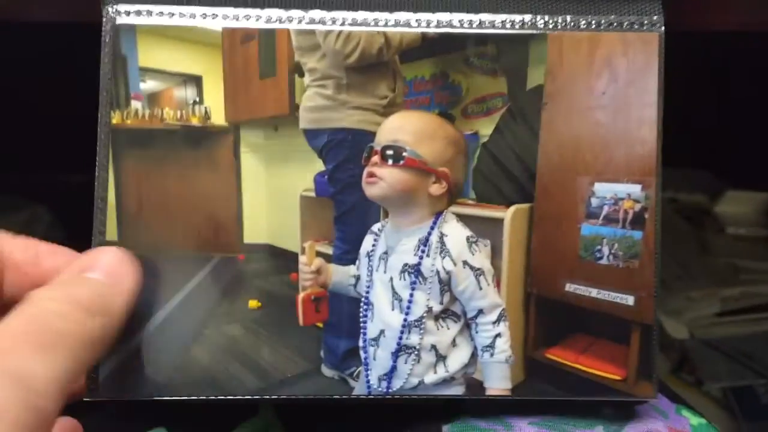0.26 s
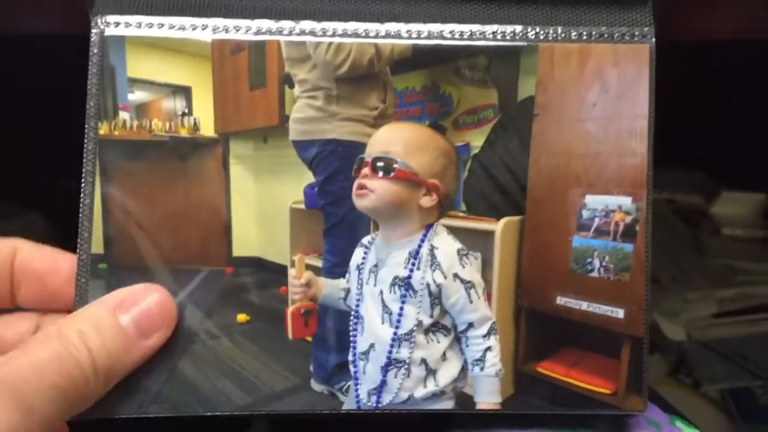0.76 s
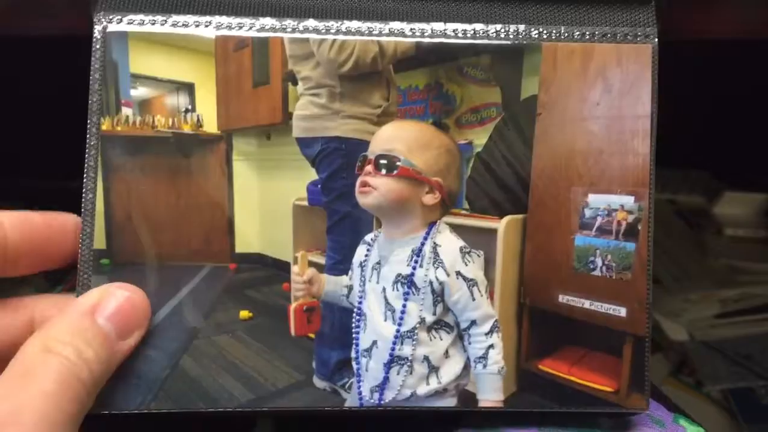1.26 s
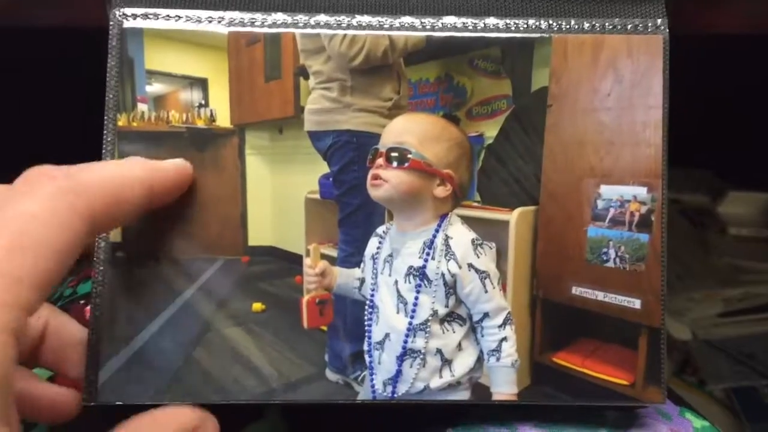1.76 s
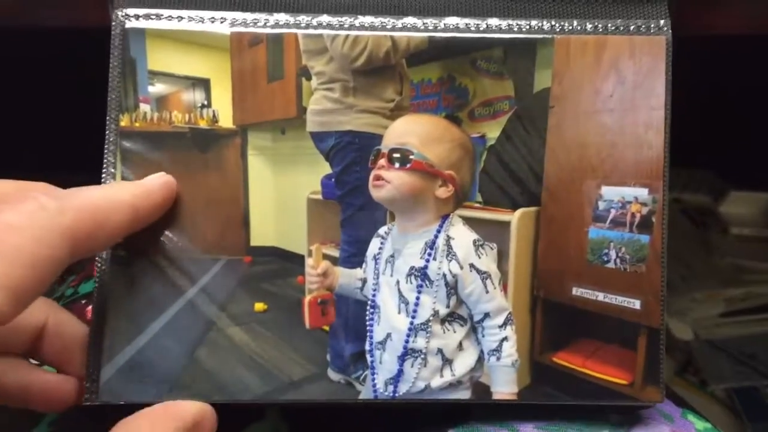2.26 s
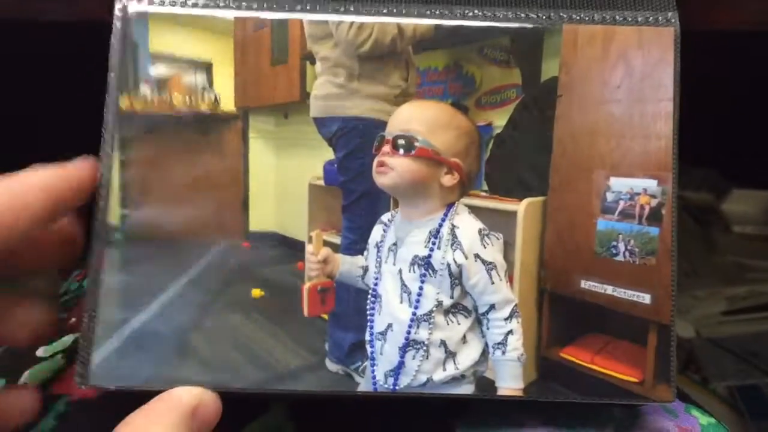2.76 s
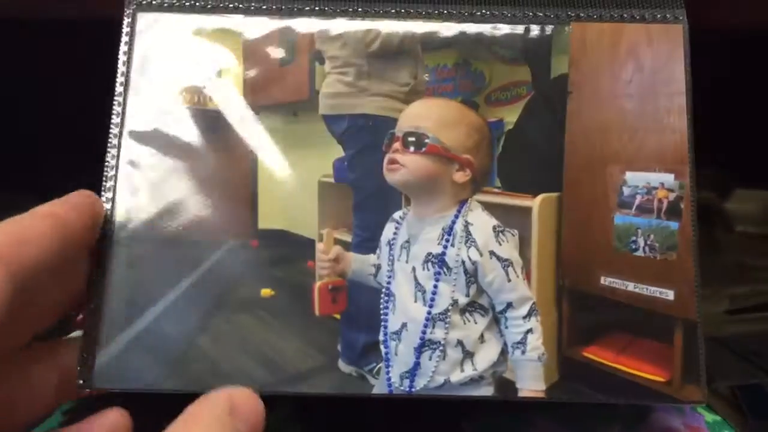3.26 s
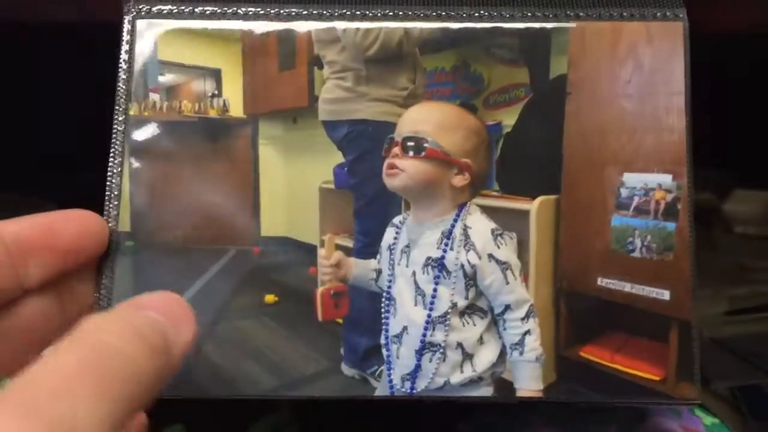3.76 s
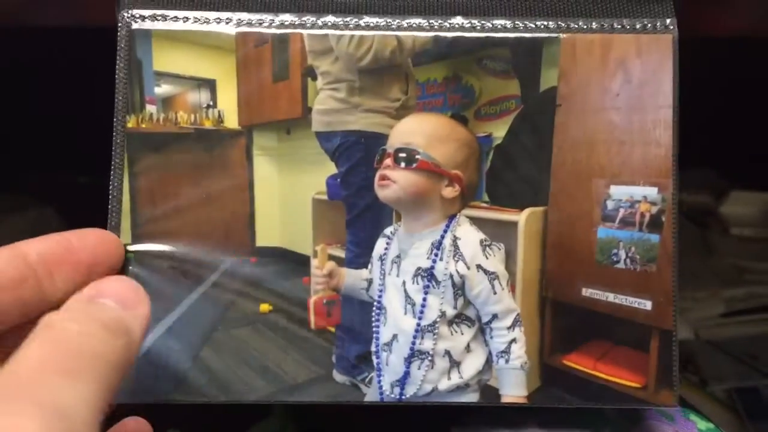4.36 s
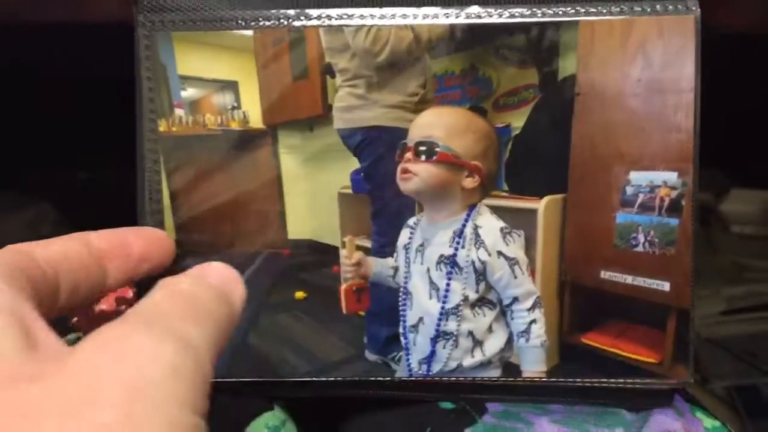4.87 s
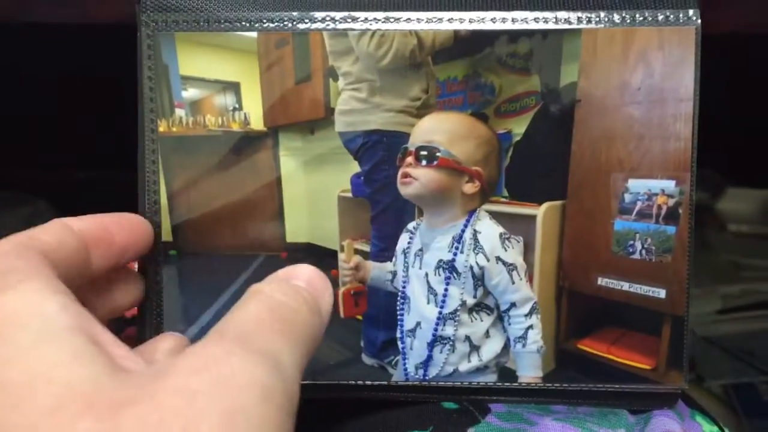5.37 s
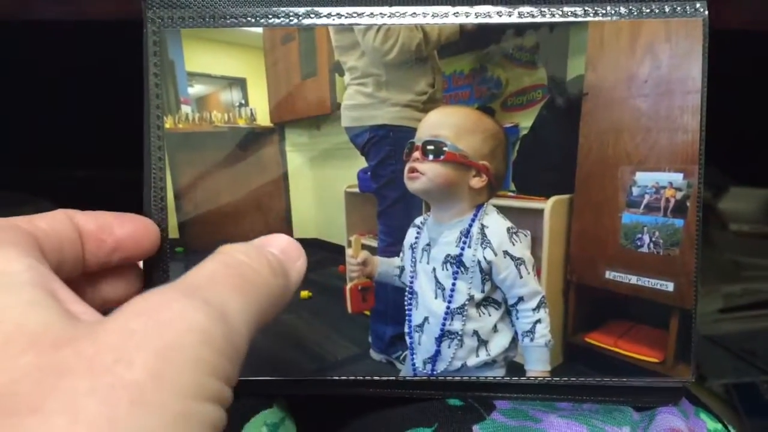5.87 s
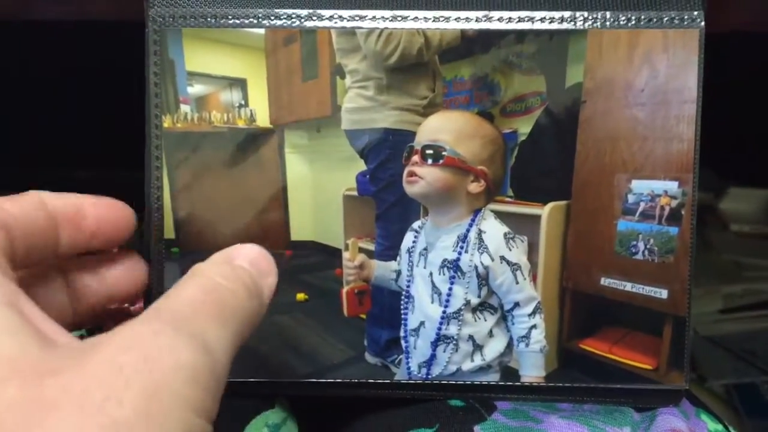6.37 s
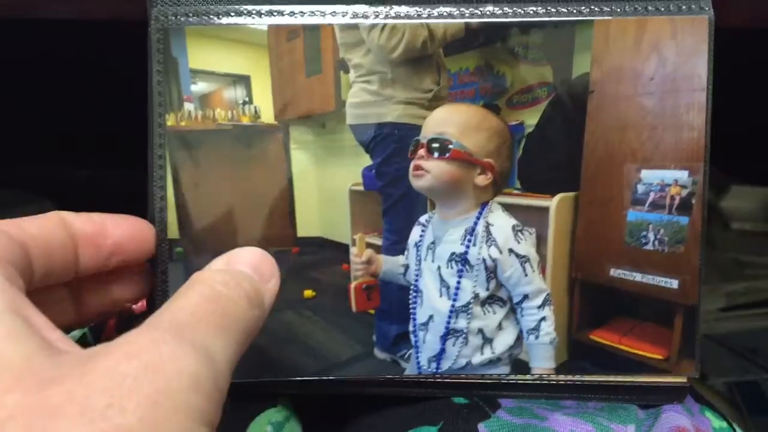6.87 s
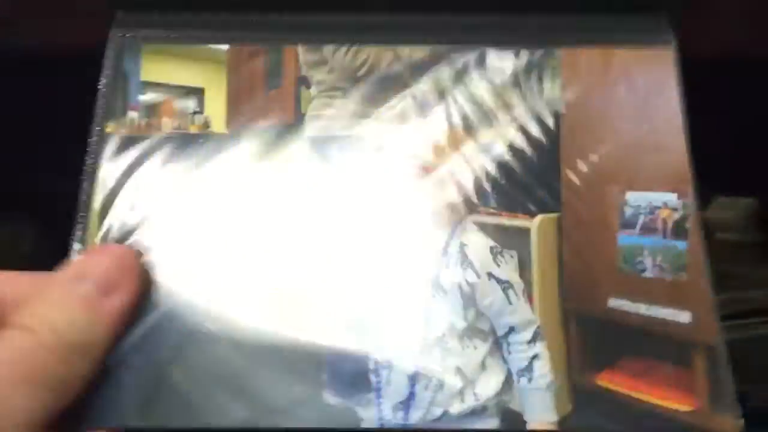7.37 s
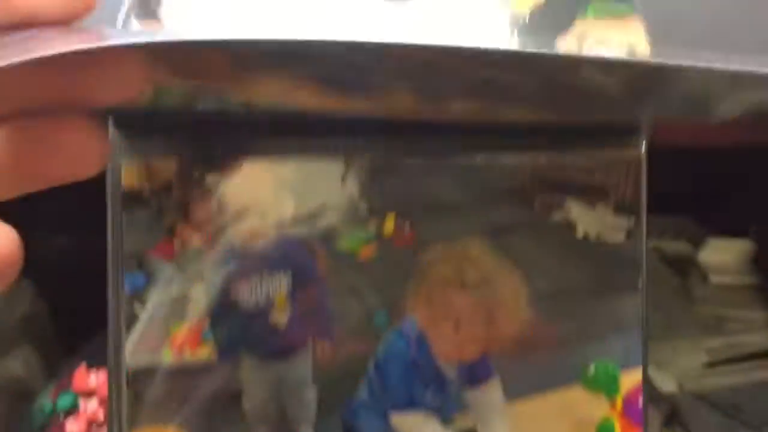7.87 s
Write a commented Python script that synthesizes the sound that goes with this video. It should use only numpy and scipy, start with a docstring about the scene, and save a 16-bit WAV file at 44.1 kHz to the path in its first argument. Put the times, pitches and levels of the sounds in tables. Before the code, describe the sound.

Clear plastic film crackles, ticks and swishes under fingers in a quiet room, with soft bumps and a sharp snap over a faint low hum.

```python
"""A hand holds, flexes and turns a clear plastic sleeve of a photo album, close to the microphone in a small room.
A faint rush of air (filtered noise) and a low machine hum (a wavering sine) run throughout.
Fingers swish over the film in dense runs of tiny slips, and the film ticks as it unsticks: sharp, ringing impulses.
Among these the album takes soft bumps, short puffs of dull noise; late on, the sleeve buckles in three ringing snaps."""
import sys
import numpy as np
from scipy import signal
from scipy.fft import rfft, irfft, next_fast_len
from scipy.io import wavfile
from scipy.ndimage import map_coordinates

SR = 44100
rng = np.random.default_rng(int(sys.argv[2]) if len(sys.argv) > 2 else 0)


def transcribe(signal):
    """Save signal, clipped to [-1, 1], as a 16-bit WAV file at the path in sys.argv[1]."""
    frames = np.atleast_2d(signal).T
    limited = np.clip(frames, -1, 1)
    pcm = np.round(limited * 32767).astype(np.int16)
    wavfile.write(sys.argv[1], SR, pcm)


N = 358533
FILTER_HZ = abs(np.fft.fftfreq(2048, 1 / SR))  # frequency grid of every colouring filter


def amp(db):
    """Turns decibels into an amplitude factor."""
    return 10 ** (np.asarray(db) / 20)


def unit(x):
    """Scales to an rms of one."""
    return x / np.sqrt(np.mean(x ** 2) + 1e-20)


def read(points, hz):
    """Joins points by straight lines over log frequency."""
    f, value = np.transpose(points)
    return np.interp(np.log(hz + 1), np.log(f), value)


def add(mix, start_s, sound):
    """Mixes a sound in at a time, cut at the end of the mix."""
    part = mix[max(round(start_s * SR), 0):][:len(sound)]
    part += sound[:len(part)]


def colour(x, response_db, slope=0):
    """Minimum-phase filter with the given response, tilted by slope dB per octave around 1 kHz."""
    tilt_db = slope * np.log2(np.maximum(FILTER_HZ, 150) / 1000)  # the tilt stops below 150 Hz
    log_gain = np.log(amp(response_db + tilt_db))
    taps = np.fft.ifft(np.exp(np.conj(signal.hilbert(log_gain)))).real
    return signal.fftconvolve(x, taps[:len(taps) // 2])


def wander(rate, size):
    """Random curve of about unit spread: straight lines between rate random points a second."""
    knots = rng.standard_normal(2000)
    curve = map_coordinates(knots, [np.arange(size) * rate / SR], order=1, mode="mirror")
    return curve / np.sqrt(2 / 3)  # makes up for the spread lost between the points


def peaks(modes):
    """Power response of a set of resonances."""
    return sum(amp(db) ** 2 / (1 + ((FILTER_HZ - hz) / width) ** 2) ** 2 for hz, width, db in modes)


def film(ring_hz, ring_db, ring_octaves, ripple_db):
    """Response in dB of one spot of film: a main resonance set by the size of the fold, and smaller chance ones."""
    # overall spectrum of the film: freq_hz [Hz], level_db [dB]
    film_spectrum = [(200, -28), (600, -29), (1000, -11), (1350, 0.5), (1700, -2.5), (2300, -1),
                     (3300, -1.5), (5000, -4), (7500, -5.5), (9500, -6), (10700, -7.5), (12500, -6.5),
                     (15000, -8), (16500, -14.5)]
    ripple_hz = np.geomspace(600, 17000, 60)
    ripple = ripple_db * np.interp(FILTER_HZ, ripple_hz, rng.standard_normal(len(ripple_hz)))
    octaves_off = np.log2((FILTER_HZ + 1) / ring_hz)
    ring = ring_db / (1 + (octaves_off / ring_octaves) ** 2)
    return read(film_spectrum, FILTER_HZ) + ring + ripple


def air(air_db=-66.5, waver_db=4, waver_rate=20, drift=0.02, drift_rate=12):
    """Steady rush of air with hollow resonances that each waver in strength and pitch."""
    # spectrum of the rush, relative: freq_hz [Hz], level_db [dB]
    air_spectrum = [(25, -17), (45, -3), (75, -4.5), (100, -19), (135, -13.5), (170, -21.5), (250, -12),
                    (330, -26), (460, -27), (1100, -27), (2050, -31), (2600, -35.5), (5000, -41),
                    (15500, -48.5)]
    # hollow resonances in the rush: centre_hz [Hz], width_hz [Hz], level_db [dB rms]
    air_resonances = [(231.2, 15, -68), (297.3, 26.6, -71.5), (340.6, 17.4, -75.5), (390, 15, -77),
                      (921.5, 27, -77), (970, 12, -92.5), (1045, 11.7, -77), (1235, 10, -84),
                      (1291, 26, -76.5), (1383, 12, -81.5), (1828, 57, -78.5), (1986, 34, -82),
                      (2062, 17, -85), (2350, 10, -88.5)]
    hz = np.fft.rfftfreq(N, 1 / SR)
    wash = rfft(rng.standard_normal(N)) * amp(read(air_spectrum, hz))
    # air_db is the rms level of the part above 150 Hz
    out = amp(air_db) * irfft(wash, N) / np.std(irfft(wash * (hz > 150), N))
    size = next_fast_len(N, True)
    hz = np.fft.rfftfreq(size, 1 / SR)
    for centre_hz, width_hz, level_db in air_resonances:
        band = 1 / (1 + ((hz - centre_hz) / width_hz) ** 2)
        ring = irfft(rfft(rng.standard_normal(size)) * band, size)
        # playing the ring at a wavering speed bends its pitch; drift is a fraction of the speed
        position = np.cumsum(1 + drift * wander(drift_rate, N)) % size
        ring = np.interp(position, np.arange(size), ring)
        out += amp(level_db) * unit(ring * amp(waver_db * wander(waver_rate, N)))
    return out


def hum(hum_hz=57.74, drift_hz=0.15, drift_rate=5, waver_db=-67, waver_rate=14, mains_hz=120, mains_db=-75):
    """A motor's low hum, whose wavering shows more as it fades, and a faint mains tone."""
    # level of the hum, fading unevenly: time_s [s], level_db [dB rms]
    hum_level = [(0.0, -45), (4.25, -46.5), (4.5, -48), (6.5, -47.5), (6.8, -50.5), (7.5, -48), (7.75, -52),
                 (8.13, -49.5)]
    t = np.arange(N) / SR
    phase = 2 * np.pi * np.cumsum(hum_hz + drift_hz * wander(drift_rate, N)) / SR
    level = amp(np.interp(t, *np.transpose(hum_level))) + amp(waver_db) * wander(waver_rate, N)
    mains = amp(mains_db) * np.sin(2 * np.pi * mains_hz * t)
    return np.sqrt(2) * (level * np.sin(phase) + mains)


def swishes(slips_per_s=350, spread_db=3.5, edge_db=18, roundness=1.15, grip_db=0.5, grip_rate=170,
            shift_db=7, shift_rate=80, reach=0.64, trim_db=-1, count=5):
    """Sliding is a dense run of tiny slips that swells and dies away across spots of film, each with its own ring."""
    # slides of skin or film over film: crest_s [s], rise_s [s], fall_s [s], level_db [dB at the crest, before
    # trim_db], slope [dB per octave], first_hz [Hz, ring of first spot], last_hz [Hz, of last], grain [0-1]
    swish_events = [(0.311, 0.01, 0.011, -60, -6.5, 2400, 3500, 0.7),
                    (0.43, 0.16, 0.14, -73, -2, 3800, 7000, 0.8),
                    (0.528, 0.017, 0.017, -62.5, -4, 2000, 4000, .8),
                    (0.735, 0.05, 0.087, -66, 2, 3400, 4500, .5),
                    (0.811, 0.019, 0.0057, -47, -0.5, 2400, 3600, 0.9),
                    (1.56, 0.064, 0.077, -69, -1, 6000, 6000, .3),
                    (1.597, 0.038, 0.02, -62.5, -2.5, 3600, 4800, .4),
                    (1.684, 0.036, 0.0064, -46.5, 1.5, 3200, 5200, 0.4),
                    (1.802, 0.05, .016, -53, 0, 3400, 3600, .7),
                    (1.806, 0.051, 0.027, -51, 0, 9500, 9500, .5),
                    (2.161, 0.0046, 0.0057, -51, 3, 3400, 12000, 0.66),
                    (2.188, 0.025, 0.045, -58, 0.5, 6500, 4500, .4),
                    (2.245, 0.041, 0.072, -55.5, 1, 6500, 3400, 0.46),
                    (2.283, 0.041, 0.044, -57.5, 1.5, 8200, 8800, 0.45),
                    (2.687, 0.012, 0.012, -60, -2.5, 5600, 5600, .6),
                    (3.013, 0.021, 0.019, -53.5, 6, 10400, 10400, 0.63),
                    (3.342, 0.02, 0.094, -49.5, 0.5, 4470, 3400, 0.5),
                    (3.542, 0.024, 0.012, -44, 2, 9000, 3500, 0.45),
                    (4.915, 0.029, 0.008, -55.5, 0, 9600, 9600, 0.3),
                    (5.016, 0.028, 0.008, -53, 1, 6600, 2500, .7),
                    (5.134, 0.042, 0.042, -63.5, 5, 3000, 3000, 0.6),
                    (5.355, 0.029, 0.025, -59, -1, 12200, 12200, 0.25),
                    (5.568, 0.0047, 0.03, -60.5, 8, 3000, 3000, 0.5),
                    (6.588, 0.013, 0.015, -49.5, 4, 3700, 3900, 0.33),
                    (7.387, 0.059, 0.059, -60.5, 1.5, 1900, 12000, 0.56),
                    (7.468, 0.061, 0.11, -64.5, 2, 14000, 6600, 0.35),
                    (7.603, 0.052, 0.07, -67.5, 2, 7000, 6500, 0.4),
                    (7.738, 0.064, 0.061, -61.5, 3, 3600, 7500, 0.4),
                    (7.723, 0.023, 0.031, -57, -12.5, 1200, 1500, 0.7),
                    (7.791, 0.023, 0.026, -57, -11, 1300, 1400, 0.64),
                    (7.916, 0.027, 0.035, -62.5, -12.5, 1300, 1300, 0.7),
                    (7.786, 0.094, 0.089, -64, 3, 7000, 3200, .25),
                    (7.812, 0.016, 0.014, -49.5, 8, 6600, 3100, 0.5),
                    (7.888, 0.051, 0.035, -66.5, 7, 13500, 13000, .2),
                    (8.109, 0.085, 0.09, -63, 3.5, 13000, 9500, 0.57)]
    out, t = np.zeros(N), np.arange(SR // 3) / SR
    for crest_s, rise_s, fall_s, level_db, slope, first_hz, last_hz, grain in swish_events:
        away = np.minimum(np.maximum(1 - t / rise_s, (t - rise_s) / fall_s), 1)  # 0 at the crest, 1 at both ends
        end_fade = np.minimum(10 * (1 - away), 1)
        stroke = amp(-edge_db * away ** roundness) * end_fade
        # the grip catches and lets go, so the rub comes in clumps
        grip = amp(grain * grip_db * wander(grip_rate, len(t)))
        # pressure passes from the first spot to the last, shifting at random on the way
        travel = np.minimum(t / (rise_s + fall_s), 1)
        pressure = []
        for spot in np.linspace(0, 1, count):
            shift = amp(shift_db * wander(shift_rate, len(t)))
            pressure.append(shift * np.exp(-((travel - spot) / reach) ** 2))
        shares = np.array(pressure) / np.linalg.norm(pressure, axis=0)
        rub = 0
        for share, ring_hz in zip(shares, np.geomspace(first_hz, last_hz, count)):
            sizes = amp(spread_db * np.minimum(rng.exponential(1, len(t)), 4))
            signs = rng.choice([-1, 1], len(t))
            slips = sizes * signs * (rng.random(len(t)) < slips_per_s / SR)
            # grain blends from smooth hiss to separate slips
            friction = grain * unit(slips) + (1 - grain) * rng.standard_normal(len(t))
            response_db = film(ring_hz, ring_db=7.5, ring_octaves=0.21, ripple_db=5)
            rub = rub + share * unit(colour(friction * grip, response_db, slope)[:len(t)])
        add(out, crest_s - rise_s, amp(level_db + trim_db) * stroke * rub)
    return out


def ticks(rise_s=0.00065, decay_s=0.0023):
    """Where film unsticks or creases: a sharp release and a scatter of waves in the film."""
    # single ticks: release_s [s], energy_db [dB], slope [dB per octave], ring_hz [Hz, ring of the fold], rasp [0-1]
    tick_events = [(0.4392, -45, 1, 13500, .1), (0.445, -36, 1, 6050, .4), (0.4603, -41.5, 0, 7300, 0.3),
                   (0.489, -41.5, 1, 7300, .05), (0.7245, -39, 4, 4500, .4), (0.736, -30, 1, 12000, .3),
                   (0.7635, -31.5, 2.5, 3900, 0.07), (0.771, -37, 0, 14000, .2),
                   (0.813, -23.5, -0.5, 13500, .6), (0.8133, -26, -1.5, 3430, 0),
                   (0.8159, -20.5, -1, 3520, .15), (1.2548, -38, -5, 2100, 0),
                   (1.272, -36.5, -3, 2400, 0.06), (1.292, -37.5, -2, 2300, .2), (1.658, -36, -1, 3600, .2),
                   (1.6653, -27, -3, 3300, 0), (1.672, -24, -1, 3000, .3), (1.6745, -20, -5, 3900, .2),
                   (1.6766, -19.5, -2, 2440, 0.36), (1.6779, -17, 3, 5200, 0.1),
                   (1.6847, -22, 2, 14000, .6), (1.6876, -19.5, 3.5, 3270, 0.3), (1.819, -23, 1, 3600, 0.7),
                   (1.822, -29, 1.5, 3500, 0.2), (2.1618, -32, -1.5, 9500, .2), (2.165, -35, -1, 6960, .2),
                   (2.199, -46, -4, 1900, .3), (2.24, -36, -1, 7200, .1), (2.2535, -35, 1, 3500, .1),
                   (2.2674, -37, -2, 4200, .1), (2.283, -43, 0, 8500, .2), (2.8833, -37.5, -2.5, 2400, 0.5),
                   (3.3305, -39, -2, 4000, 0.1), (3.34, -25, 1, 13500, 0.3), (3.3605, -33, 0, 3900, 0.3),
                   (3.3708, -40, 0, 8300, 0.2), (3.377, -36, -3, 3700, .1), (3.3825, -37, -6, 3900, .1),
                   (3.3928, -32, 0, 3300, 0.04), (3.4178, -36, 0.5, 6500, .25),
                   (3.4402, -32.5, -1, 4200, .5), (3.4505, -35, 0, 4000, .3), (3.492, -33.5, 1, 14000, 0.2),
                   (3.5033, -34, 0, 3800, .4), (3.5115, -34, 3, 4000, 0.63),
                   (3.5171, -23.5, -2.5, 3900, 0.03), (3.5239, -24, -5, 4300, 0.1),
                   (3.53, -19, -4.5, 3700, 0.15), (3.542, -27, 5, 3700, 0.2), (3.545, -28, -6, 3500, .2),
                   (4, -37, 4, 5600, .5), (4.0068, -34.5, 2, 5400, 0.2), (4.0663, -23, -2, 3900, 0),
                   (4.0681, -19, -2.5, 4700, 0.11), (5.0204, -22.5, -1, 6430, 0.2),
                   (5.1298, -33, 7, 3100, 0), (5.138, -36, 2, 7000, 0), (5.357, -31.5, 0, 3670, 0),
                   (5.5609, -33.5, -1, 14500, .05), (5.566, -31, 1, 14500, 0.26),
                   (6.391, -32, 12, 7000, .15), (6.577, -30.5, 5, 3900, 0.3), (6.728, -43, 2, 8000, .6),
                   (6.8822, -39, 0, 7500, 0), (7.0845, -40.5, -1.5, 7900, 0), (7.21, -20.5, 1, 6500, 0.02),
                   (7.3855, -43, -2, 3000, 0.3), (7.4231, -29.5, 1.5, 1730, 0.01),
                   (7.8093, -34, 4, 6600, 0.3), (7.8121, -29, 2.5, 3080, .3), (7.815, -35, 0, 3500, .3),
                   (8.118, -38, 3, 1600, 0)]
    out, t = np.zeros(N), np.arange(-100, 300) / SR  # the release is at t = 0
    for release_s, energy_db, slope, ring_hz, rasp in tick_events:
        scatter = rng.standard_normal(len(t)) * np.exp(np.minimum(t / rise_s, -t / decay_s))
        release = rasp * scatter + (t == 0)
        sound = colour(release, film(ring_hz, ring_db=10.5, ring_octaves=0.32, ripple_db=3), slope)
        add(out, release_s + t[0], amp(energy_db) * sound / np.linalg.norm(sound))
    return out


def bumps(page_db=7, page_width_hz=150):
    """Soft contacts give a short dull puff from the stack of pages, with a hollow note from the page touched."""
    # soft knocks of fingers and page: crest_s [s], level_db [dB at the crest], length_s [s, time constant],
    # slope [dB per octave], page_hz [Hz, note of the page]
    bump_events = [(1.245, -51, 0.0046, -4.5, 1050), (1.272, -59, 0.0052, 4, 1350),
                   (1.293, -52, 0.0066, -4, 1080), (2.166, -55, 0.0052, 4, 1300),
                   (3.347, -48.5, 0.0057, 9.5, 1290), (4.07, -51, 0.0016, 1, 1400),
                   (5.023, -46, 0.0032, 2.5, 980), (5.058, -58, 0.023, -5.5, 950),
                   (5.332, -54.5, 0.0089, -3.5, 1050), (5.352, -56, 0.0033, 0, 720),
                   (5.554, -55, 0.0046, -1.5, 900), (5.564, -54, 0.0063, -1, 720),
                   (6.419, -50, 0.0053, -3, 1000), (6.599, -51.5, 0.0066, -0.5, 1080),
                   (7.389, -51, 0.0063, 3.5, 1340), (7.402, -52, 0.0063, 0, 380),
                   (7.426, -49.5, 0.0067, -2, 200), (7.4235, -48, 0.002, 10.5, 1620),
                   (7.585, -50.5, 0.00245, 1, 1260), (7.588, -47, 0.005, -1.5, 480),
                   (8.121, -47.5, 0.0038, 11, 1600)]
    # dull spectrum of the album: freq_hz [Hz], level_db [dB]
    album_spectrum = [(40, -23), (90, 9), (220, -2.5), (400, -5.5), (620, -7), (1000, -6), (1400, -4.5),
                      (2200, -27), (4000, -54), (16000, -50)]
    out, t = np.zeros(N), np.arange(SR // 3) / SR
    for crest_s, level_db, length_s, slope, page_hz in bump_events:
        age = t / length_s - 2  # 0 at the crest
        contact = np.exp(-np.where(age < 0, age ** 2, age))
        page_note = page_db / (1 + ((FILTER_HZ - page_hz) / page_width_hz) ** 2)
        body = read(album_spectrum, FILTER_HZ) + page_note
        puff = unit(colour(rng.standard_normal(len(t)), body, slope)[:len(t)])
        add(out, crest_s - 2 * length_s, amp(level_db) * contact * puff)
    return out


def snaps(scatter=0.11, rise_s=0.00028, fold_s=0.00096, fold_width_hz=1100, first_db=-5, second_db=-5):
    """The sheet flips through in an instant, rings briefly with two notes set by the fold, and knocks on the photo."""
    # buckles of the sleeve: snap_s [s], energy_db [dB], slope [dB per octave], knock_db [dB, knock on the photo],
    # first_hz [Hz, first ring of the fold], second_hz [Hz, second ring]
    snap_events = [(6.27, -14.5, -1, -9.5, 4730, 11800), (6.363, -12, -3, -9.5, 7700, 12000),
                   (6.416, 1, 0.5, 6, 9400, 14750)]
    # rings of the buckling sleeve: freq_hz [Hz], width_hz [Hz], level_db [dB]
    sleeve_modes = [(2100, 190, 1), (2480, 290, 3), (3450, 420, 1), (4200, 780, -5), (5660, 830, -10),
                    (8400, 560, -10), (9500, 500, -12), (11400, 380, -21), (13500, 530, -8),
                    (15400, 700, -9)]
    # rings of the stiff photo inside: freq_hz [Hz], width_hz [Hz], level_db [dB, before knock_db]
    photo_modes = [(406, 53, -14), (867, 72, -9), (1110, 120, 2), (1350, 150, -7)]
    out, t = np.zeros(N), np.arange(-100, 200) / SR  # the flip is at t = 0
    for snap_s, energy_db, slope, knock_db, first_hz, second_hz in snap_events:
        # the fold runs across the sheet, so part of the blow is spread over about a ms
        spread = rng.standard_normal(len(t)) * np.exp(np.minimum(t / rise_s, -t / fold_s))
        blow = scatter * spread + (t == 0)
        fold = peaks([(first_hz, fold_width_hz, first_db), (second_hz, 2 * fold_width_hz, second_db)])
        photo = amp(knock_db) ** 2 * peaks(photo_modes)
        snap = colour(blow, 10 * np.log10(peaks(sleeve_modes) + fold + photo), slope)
        add(out, snap_s + t[0], amp(energy_db) * snap / np.linalg.norm(snap))
    return out


def room(x, tail_db=-21.5, near_db=-13.5, near_s=0.016, dull_hz=12000):
    """Quick reflections from album, hands and lap, then the room's faint tail; soft surfaces dull the top of both."""
    # room decay: freq_hz [Hz], t60_s [s]
    room_decay = [(200, 0.32), (1500, 0.26), (5000, 0.33), (15000, 0.25)]
    t = np.arange(SR // 2) / SR
    echoes = rng.standard_normal(len(t)) * (rng.random(len(t)) < .25)
    # each frequency band of the tail falls 60 dB in its own decay time
    hz, when, bands = signal.stft(echoes, SR, nperseg=256)
    decay = amp(-60 * when / read(room_decay, hz)[:, None])
    tail = signal.istft(bands * decay, SR, nperseg=256)[1][:len(t)] * (t > .006)
    near = rng.standard_normal(len(t)) * (rng.random(len(t)) < .2)
    near = near * np.exp(-t / near_s) * (t > .001)
    response = amp(tail_db) * tail / np.linalg.norm(tail) + amp(near_db) * near / np.linalg.norm(near)
    dulling_db = -10 * np.log10(1 + (FILTER_HZ / dull_hz) ** 2)
    return signal.fftconvolve(x, colour(response, dulling_db))[:N]


def scene():
    """The handled album and its reflections, over the air and the hum."""
    album = swishes() + ticks() + bumps() + snaps()
    return (air() + hum() + album + room(album))[None]


def record(dry, edge_hz=16050):
    """The microphone's colour, then the recorder's band limit: a steep low-pass at edge_hz."""
    # narrow dips of the microphone port: freq_hz [Hz], width_hz [Hz], depth_db [dB]
    port_dips = [(5000, 270, -2), (10400, 100, -11)]
    port_db = sum(db / (1 + ((FILTER_HZ - hz) / width) ** 2) for hz, width, db in port_dips)
    heard = colour(dry[0], port_db)[:N]
    low_pass = signal.firwin(401, edge_hz, window=("kaiser", 8), fs=SR)
    return signal.oaconvolve(heard, low_pass, "same")[None]


dry = scene()
out = record(dry)
transcribe(out)
```